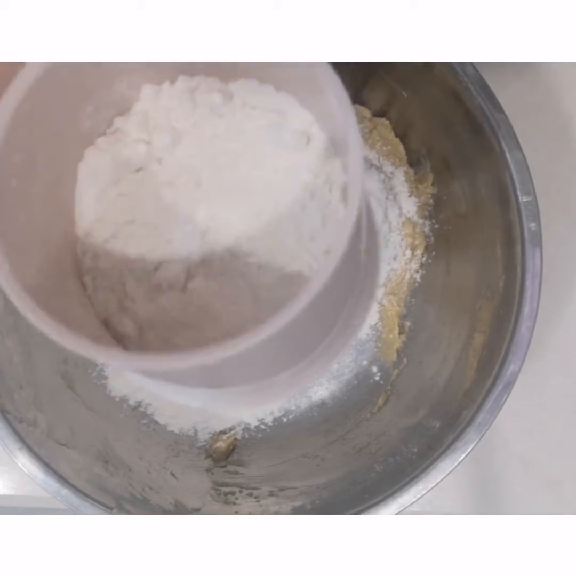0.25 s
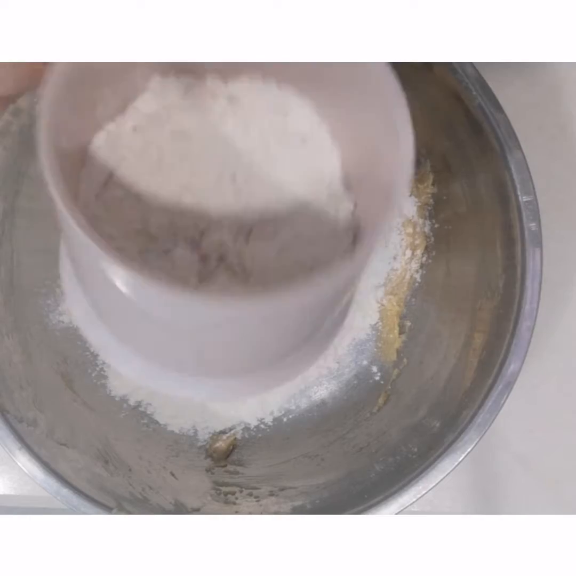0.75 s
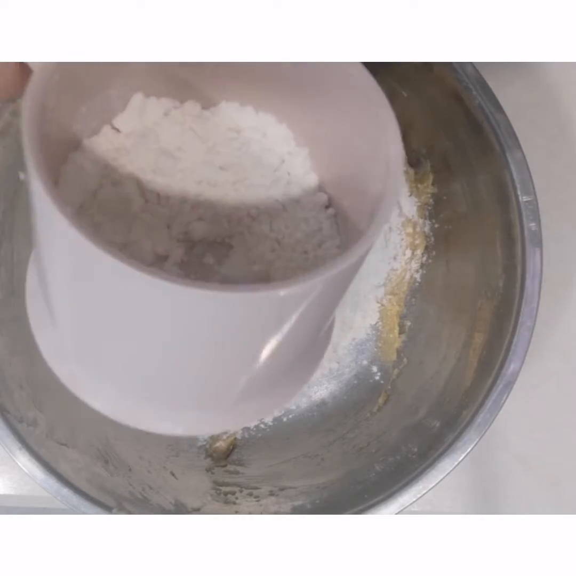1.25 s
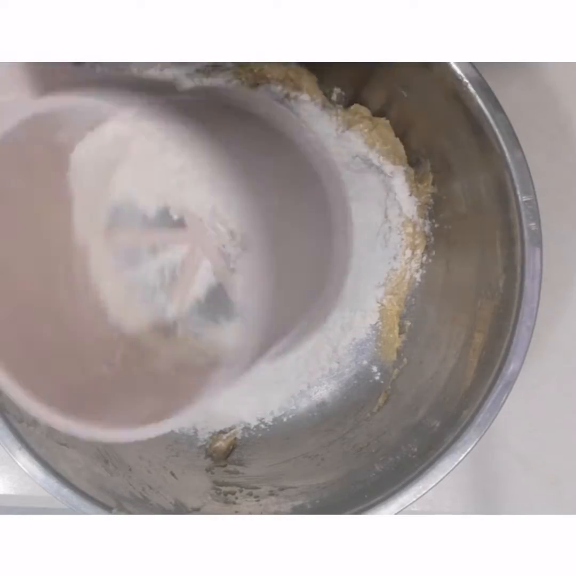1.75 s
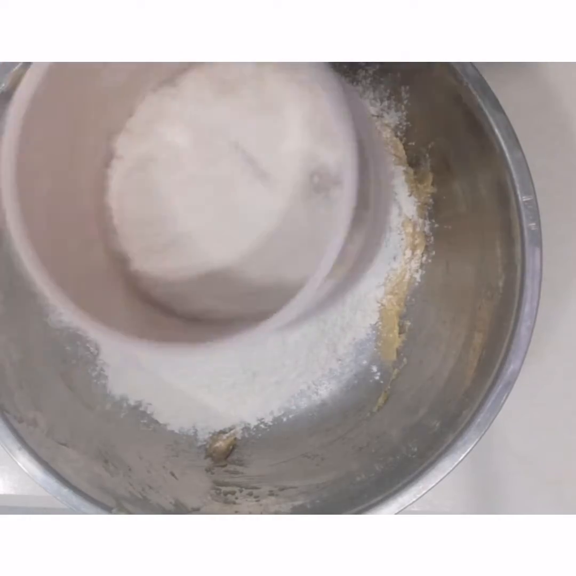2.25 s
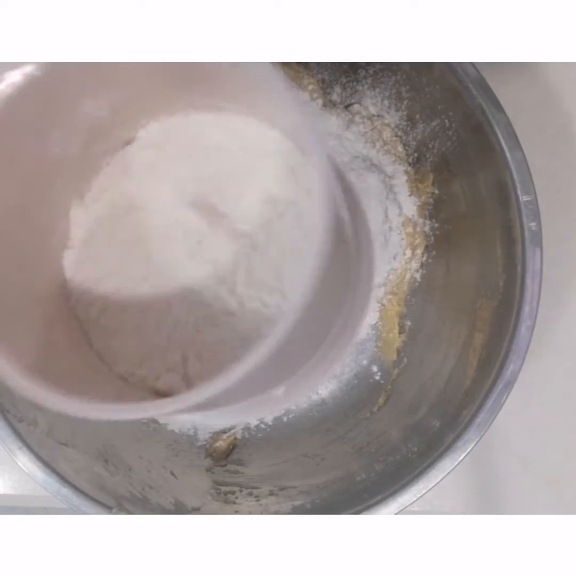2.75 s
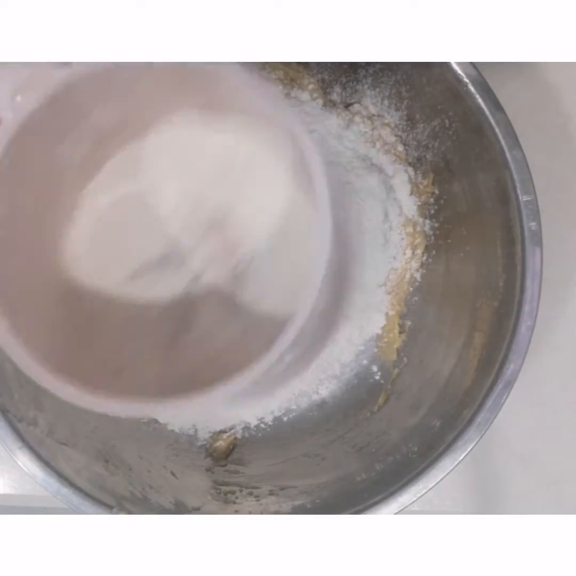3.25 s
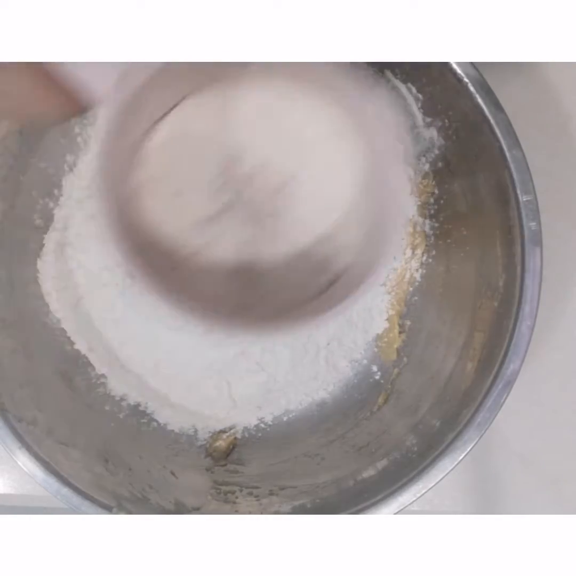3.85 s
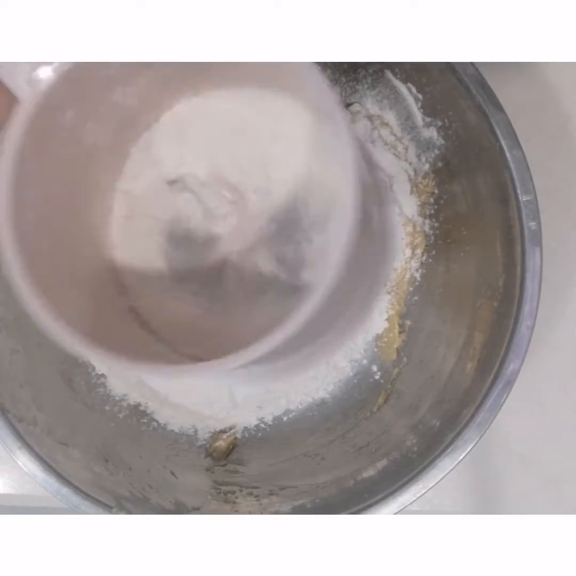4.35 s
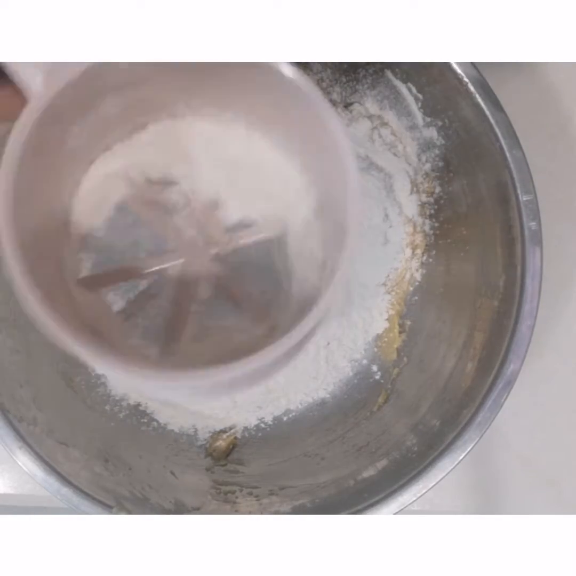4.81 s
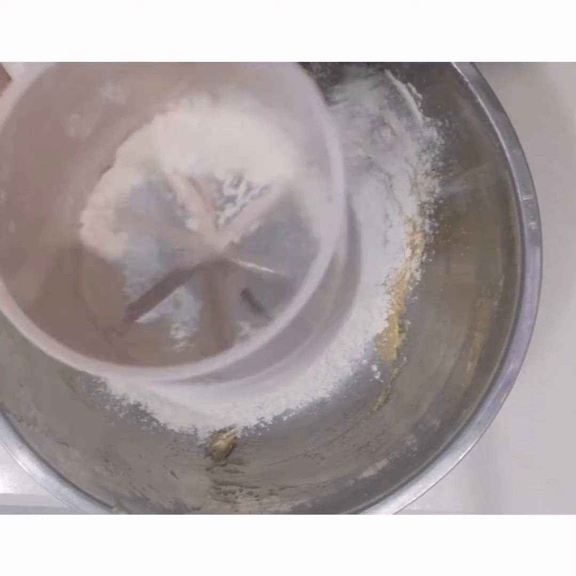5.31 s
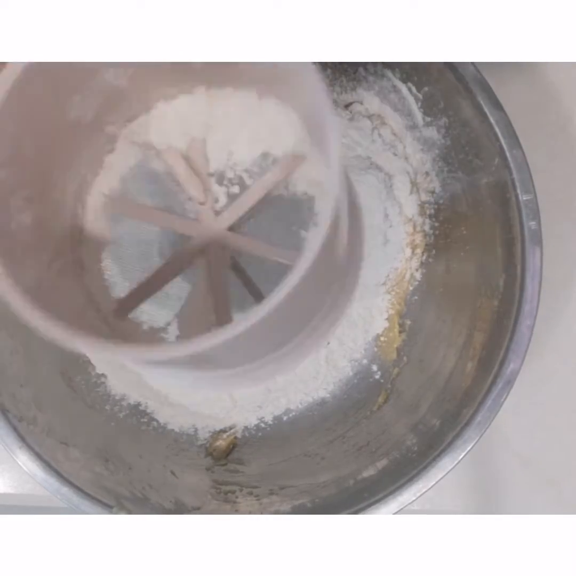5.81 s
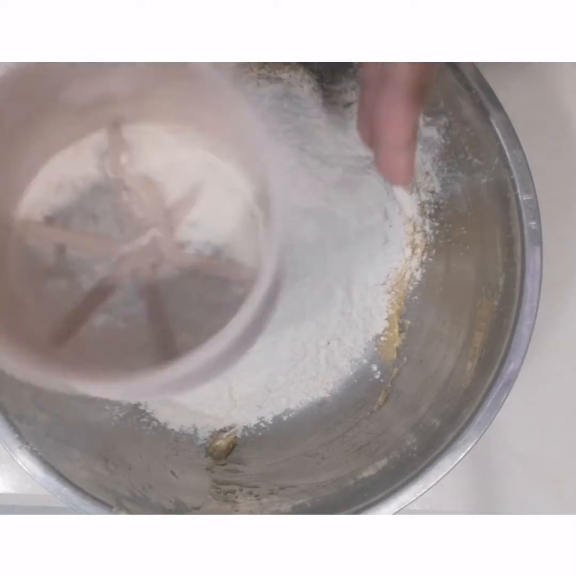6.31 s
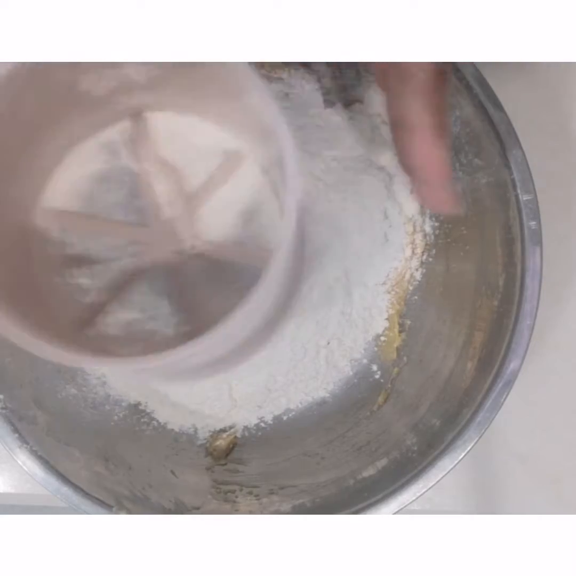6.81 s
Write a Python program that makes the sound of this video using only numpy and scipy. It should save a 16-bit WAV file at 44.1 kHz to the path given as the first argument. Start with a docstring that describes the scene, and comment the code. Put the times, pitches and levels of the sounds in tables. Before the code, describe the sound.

Close up in a small kitchen, a plastic flour sifter is squeezed over a steel bowl, about three times a second. Each squeeze rasps across wire mesh and ends in a sharp knock, followed by a softer return scrape. Six squeezes come first, then two, then seven, with short pauses between. The knocks brighten as the flour runs out, and the bowl rings faintly over a low hum.

```python
"""A plastic flour sifter is squeezed in three bursts over a steel mixing bowl in a small kitchen.
Each squeeze drags the blades over the wire mesh, ever faster, until the trigger knocks on its stop;
a spring pulls them back with a softer scrape. The knock brightens as the flour runs out.
Bowl and room ring on, over a low hum; a noise suppressor cuts the quiet tails short."""
import sys
import numpy as np
from scipy import signal
from scipy.fft import rfft, irfft, next_fast_len
from scipy.io import wavfile
from scipy.ndimage import uniform_filter1d, map_coordinates

SR = 44100
rng = np.random.default_rng(int(sys.argv[2]) if len(sys.argv) > 2 else 0)


def transcribe(signal):
    """Save signal, clipped to [-1, 1], as a 16-bit WAV file at the path in sys.argv[1]."""
    frames = np.atleast_2d(signal).T
    limited = np.clip(frames, -1, 1)
    pcm = np.round(limited * 32767).astype(np.int16)
    wavfile.write(sys.argv[1], SR, pcm)


N = 311787


def amp(db):
    """Turn decibels into a gain."""
    return 10 ** (np.asarray(db) / 20)


def unit(x):
    """Scale a sound to an average (rms) level of 1."""
    return x / np.sqrt(np.mean(x ** 2) + 1e-20)


def clock(seconds):
    """The time of each sample."""
    return np.arange(int(seconds * SR)) / SR


def along(points, hz):
    """Read between (Hz, value) rows, with octaves evenly spaced."""
    f, v = np.transpose(points)
    return np.interp(np.log(hz + 1), np.log(f + 1), v)


def curve(rows):
    """Join (seconds, value) rows into one value per sample."""
    return np.interp(np.arange(N) / SR, *np.transpose(rows))


def wobble(rate):
    """A smooth curve through `rate` random points a second."""
    return map_coordinates(rng.standard_normal(int(N * rate / SR) + 4), [np.arange(N) * rate / SR])


def swell(s, db, attack, release, hold=0):
    """A gain that reaches db at time s, holds and fades, moving 20 dB per attack or release time."""
    start = max(int((s - 2 * attack) * SR), 0)
    end = min(int((s + hold + 2 * release) * SR), N)
    t = np.arange(start, end) / SR - s
    gain = np.zeros(N)
    gain[start:end] = amp(db - 20 * np.maximum(0, np.maximum(-t / attack, (t - hold) / release)))
    return gain


def filtered(x, response):
    """Multiply each frequency in x by response(hz)."""
    n = x.shape[-1]
    m = next_fast_len(n + 8192)
    return irfft(rfft(x, m) * response(np.fft.rfftfreq(m, 1 / SR)), m)[..., :n]


def shaped(x, colour):
    """Give x a tone colour made of (Hz, dB) rows."""
    return filtered(x, lambda hz: amp(along(colour, hz)))


def add(track, s, sound):
    """Mix a sound in at time s."""
    part = track[..., max(round(s * SR), 0):][..., :sound.shape[-1]]
    part += sound[..., :part.shape[-1]]


def resonate(x, tones):
    """Let x ring a set of tones, in stereo. A ring time (t60) is the time to fade by 60 dB."""
    t = clock(.7)
    ring = sum(amp(db - 60 * t / t60) * np.sin(2 * np.pi * (hz * t + rng.random((2, 1))))
               for hz, db, t60 in tones)
    ring = unit(ring) / np.sqrt(len(t))
    return signal.fftconvolve(np.atleast_2d(x), ring, axes=1)[:, :N]


# A deep throb. Each row: time in seconds, level in dB.
THROB_LEVELS = [(0.0, -48.5), (0.35, -39.5), (1.83, -40), (2.3, -47), (2.62, -36.5), (3.31, -40.5),
                (3.48, -34.5), (3.6, -44.5), (4.31, -33.5), (4.39, -39), (5.55, -41), (5.71, -36),
                (6.61, -43.5), (6.71, -36), (6.91, -46.5), (7.07, -35.5)]
# A steady hum. Each row: pitch in Hz, level in dB.
HUM_TONES = [(49.5, -59.5), (136, -67), (236, -75.5)]
# Still air with a faint high whine. Each row: frequency in Hz, relative level in dB.
AIR_COLOUR = [(20, -8), (50, 1), (95, -8), (140, -5), (190, -12.5), (300, -17), (550, -22.5), (1100, -19.5),
              (2200, -18.5), (4000, -28.5), (8900, -32.5), (9500, -29), (10200, -38.5), (15000, -39)]

def background():
    """The room throbs, hums and hisses softly; the bass is the same on both sides."""
    def tone(hz, drift):
        return np.sqrt(2) * np.sin(2 * np.pi * hz * np.arange(N) / SR + drift * wobble(4.3))
    throb = amp(curve(THROB_LEVELS)) * tone(hz=26.3, drift=.3)
    hum = sum(amp(db + 2.5 * wobble(7)) * tone(hz, drift=1.4) for hz, db in HUM_TONES)
    mid = shaped(rng.standard_normal(N), AIR_COLOUR)
    side = filtered(rng.standard_normal(N),
                    lambda hz: amp(along(AIR_COLOUR, hz)) * hz ** 2 / (hz ** 2 + 300 ** 2))
    air = amp(-59) * np.array([mid + side, mid - side]) / np.std(mid)
    return throb + hum + air


# The rumble of the working hand. Each row: frequency in Hz, relative level in dB.
HAND_COLOUR = [(20, -14.5), (55, -1.5), (90, -7), (140, -11.5), (230, -16.5), (400, -23), (1000, -69)]

def hand(sifter):
    """Working the trigger shakes up a soft rumble that follows the sifter's loudness."""
    effort = np.sqrt(np.abs(uniform_filter1d(np.abs(sifter), size=9000)))
    rumble = shaped(rng.standard_normal(N), HAND_COLOUR)
    return amp(-60.5) * unit(effort) * unit(rumble)


# Flour leaves the cup. Each row: time in seconds, emptiness from 0 (full) to 1 (empty).
EMPTINESS = [(0, 0), (1.8, 0.2), (3.2, 0.2), (4.6, 0.86), (6.1, 1)]

def emptiness_at(s):
    """How empty the cup is at time s."""
    return np.interp(s, *np.transpose(EMPTINESS))


def lightened(x, edge_hz, loss_db):
    """With less flour weighing on it, the cup loses its low tones."""
    lows = filtered(x, lambda hz: 1 / (1 + (hz / edge_hz) ** 8))
    return x + lows * (amp(-loss_db * curve(EMPTINESS)) - 1)


# The tone colour of the wire mesh. Each row: frequency in Hz, relative level in dB.
MESH_COLOUR = [(60, -54.5), (400, -9), (620, -16), (800, -9.5), (980, -0.5), (1400, -11), (2400, -1.5),
               (3300, -7), (3900, -6.5), (5200, -6.5), (7000, -10.5), (8100, -8.5), (9500, -11),
               (10800, -20), (15000, -21.5)]

def mesh_grit(spike_db, grain_rate):
    """Mesh wires make countless tiny snaps of uneven size; the treble is scaled to level 1."""
    snaps = rng.standard_normal(N) * amp(spike_db * wobble(grain_rate))
    grit = shaped(snaps, MESH_COLOUR)
    return grit / np.std(filtered(grit, lambda hz: hz > 4000))


# The trigger is let go. Each row: start in seconds, time it gets home in seconds,
# level of the blades' first spurt in dB, level of the landing in dB.
RETURNS = [(.02, 0.081, -46.5, -41), (0.327, 0.382, -35, -41.5), (0.629, 0.682, -36, -39.5),
           (0.934, .996, -36, -39.5), (1.23, 1.291, -36.5, -38.5), (1.541, 1.597, -34, -34.5),
           (2.709, 2.763, -37.5, -35.5), (3.045, 3.102, -34.5, -37), (4.17, 4.231, -38.5, -41.5),
           (4.477, 4.534, -36.5, -37.5), (4.762, 4.814, -36.5, -36.5), (5.038, 5.096, -35, -34),
           (5.319, 5.377, -29.5, -38.5), (5.607, 5.673, -28, -42.5), (5.88, 5.943, -29.5, -36.5),
           (7.056, 7.11, -51, -42)]
# The trigger is squeezed. Each row: time it hits the stop in seconds, rasp in dB, knock in dB.
PULLS = [(0.2369, -30, -19.5), (0.5301, -27, -21.5), (0.8274, -29, -20), (1.134, -27.5, -20),
         (1.434, -24, -19.5), (1.7487, -26.5, -20), (2.9314, -26, -20.5), (3.2485, -26.5, -21),
         (4.3787, -27, -20.5), (4.67, -27.5, -17.5), (4.9532, -24, -17), (5.226, -24, -18.5),
         (5.5102, -25, -17), (5.7971, -24, -19), (6.078, -24, -23.5)]

def blades():
    """The blades scrape over the mesh, louder the faster they move."""
    pull, back = np.zeros(N), np.zeros(N)
    for s, home, spurt_db, _ in RETURNS:  # they spurt, catch once, then coast home
        back += swell(s + .01, spurt_db, attack=.01, release=.02)
        back += swell(s + .034, spurt_db - 8.5, attack=.012, release=.012)
        back += swell(s + .0062, db=-44.5, attack=.0062, release=.011, hold=home - s - .0062)
    for s, rasp_db, _ in PULLS:  # they break loose, then rasp into the stop
        loose_db = -37 + .5 * emptiness_at(s)  # louder on bare mesh
        pull += swell(s - .023, loose_db, attack=.03, release=.011)
        pull += swell(s - .0024, rasp_db, attack=.02, release=.009, hold=.0024)
    speed = amp(-.72) * pull + amp(-1.5) * back
    grit = mesh_grit(spike_db=3.5, grain_rate=1700)
    roughness = amp(1.8 * wobble(170))
    scrape = speed * grit * roughness
    # flour packed on the mesh muffles its hiss
    hiss = filtered(scrape, lambda hz: hz ** 2 / (hz ** 2 + 3800 ** 2))
    return scrape + hiss * (amp(-2.5 + 2.7 * curve(EMPTINESS)) - 1)


# The tones of the plastic cup. Each row: pitch in Hz, ring time in seconds,
# relative level in dB when full, the same when empty.
CUP_TONES = [(290, .025, -15, -41), (442, 0.054, -30.5, -20.5), (960, 0.009, -13, -26),
             (1115, 0.051, -4.5, -4.5), (1230, 0.014, -13.5, -4), (1636, 0.029, -3, 2.5),
             (2000, 0.0087, 2.5, -19.5), (2270, 0.025, 2, 6), (2610, 0.049, -5, -4),
             (3035, 0.0096, 0.5, 1.5), (3555, 0.013, -4, 3.5), (4406, 0.021, -14, -6),
             (5710, 0.014, -17.5, 0), (7270, .01, -23, -10.5)]

def cup_hit(s, crack_db, crack_t60, rise_s):
    """One hit on the cup: a short crack, and a ring that depends on the flour left at time s."""
    t, empty = clock(.08), emptiness_at(s)
    ring = np.zeros(len(t))
    for k, (hz, t60, full_db, empty_db) in enumerate(CUP_TONES):
        db = full_db + empty * (empty_db - full_db) + rng.normal(0, .62)
        pitch = hz * (1 + rng.normal(0, .0031))
        direction = (-1) ** k  # neighbouring tones start opposite ways
        ring += direction * amp(db - 60 * t / t60) * np.sin(2 * np.pi * pitch * t)
    ring *= 1 - np.exp(-t / rise_s)
    ring /= np.std(ring[:265])  # level 1 over the first 6 ms
    crack = unit(shaped(rng.standard_normal(len(t)), MESH_COLOUR))
    return ring + crack * amp(crack_db - 60 * t / crack_t60)


# Faint clicks, including sharp high ones just before some knocks.
# Each row: start in seconds, level in dB, treble boost or cut in dB.
FAINT_CLICKS = [(0.0203, -40.5, -8), (.192, -42, -3), (1.389, -50, 6), (2.591, -41, -18), (2.63, -43, -20),
                (2.871, -55, 12.5), (2.893, -37.5, 4.5), (3.536, -46, -0.5), (4.33, -50, 6.5),
                (5.465, -51.5, 11), (7.056, -52, 17.5)]
# The landing is duller than the knock. Each row: frequency in Hz, boost or cut in dB.
LANDING_COLOUR = [(400, 13), (700, 12.5), (1000, 7), (1500, -1), (4000, -5.5)]

def trigger_and_clicks():
    """The trigger knocks, chatters, takes up slack and taps home; faint clicks sound in between."""
    hits = np.zeros(N)
    for s, _, knock_db in PULLS:
        add(hits, s, amp(knock_db) * cup_hit(s, crack_db=-2, crack_t60=.007, rise_s=.00016))
        chatter_s = s + rng.uniform(.002, .003)
        chatter = cup_hit(s, crack_db=-3, crack_t60=.0073, rise_s=.00047)
        add(hits, chatter_s, amp(knock_db - 13.5) * chatter)
    for s, home, spurt_db, landing_db in RETURNS:
        slack_db = spurt_db - 11 + 10 * emptiness_at(s)
        add(hits, s + .01, amp(slack_db) * cup_hit(s, crack_db=7, crack_t60=.015, rise_s=.00045))
        tap = cup_hit(s, crack_db=6.5, crack_t60=.014, rise_s=.0005)
        add(hits, home, amp(landing_db) * shaped(tap, LANDING_COLOUR))
    for s, db, treble_db in FAINT_CLICKS:
        click = cup_hit(s, crack_db=7.5, crack_t60=.0099, rise_s=.00091)
        add(hits, s, amp(db) * shaped(click, [(1800, 0), (3000, treble_db)]))
    # so small a cup gives off little bass
    return filtered(hits, lambda hz: hz ** 2 / (hz ** 2 + 200 ** 2))


# A ring near 900 Hz. Each row: pitch in Hz, relative level in dB, ring time in seconds.
RING_TONES = [(885, 0, .15), (935, 0, .13), (985, -3, .09)]

def short_ring(scrape):
    """A short ring follows scrapes and landings; a higher one takes over as the cup empties."""
    buzz, t = np.zeros(N), clock(.15)
    for _, home, _, landing_db in RETURNS:
        add(buzz, home, amp(landing_db - 60 * t / .36) * rng.standard_normal(len(t)))
    empty = curve(EMPTINESS)
    high_share = empty ** 6  # stays small until the cup is nearly empty
    low_drive = amp(-2.5 - 1.5 * empty) * (1 - high_share) * (buzz + amp(-18) * scrape)
    high_drive = amp(-13.5) * high_share * scrape
    high_tones = [(hz * 1.18, db, t60 * .25) for hz, db, t60 in RING_TONES]
    return resonate(low_drive, RING_TONES) + resonate(high_drive, high_tones)


# The tones of the steel bowl. Each row: pitch in Hz, relative level in dB, ring time in seconds.
BOWL_TONES = [(1177, 1, 0.6), (1290, -8, .4), (1347, 3, .35), (1415, 8, 0.29), (1710, 5, 0.28),
              (1853, 3, 0.88), (2173, -1, .34), (2260, -2, 0.2), (2510, -6.5, 0.18), (2760, 2, 0.6),
              (2806, -3, 0.55), (3000, 3, 0.33), (3203, 1, 0.45), (3530, -10.5, .3), (4590, -4, 0.26),
              (4900, -6, 0.38)]

def bowl(sifter):
    """The sifter's sound sets the bowl below it ringing."""
    return amp(-15) * resonate(sifter, BOWL_TONES)


def left_first(x, lag_s):
    """Direct sound reaches the left microphone before the right."""
    return filtered(x, lambda hz: np.exp(1j * np.pi * hz * lag_s * np.array([[1], [-1]])))


# Where the mesh is heard. Each row: frequency in Hz, left level minus right level in dB.
MESH_BALANCE = [(300, -1), (900, 15), (1400, -1), (2400, -1), (7000, 10.5), (8200, 16), (9600, -17.5),
                (11000, 2)]

def lean(x):
    """Some frequencies lean to the left, others to the right."""
    return filtered(x, lambda hz: amp(along(MESH_BALANCE, hz) * np.array([[.5], [-.5]])))


def echoes(x, t60s, colour, build_up_s):
    """Countless echoes blur into stereo noise; each frequency band fades at its own speed."""
    hz, t, spectrum = signal.stft(x, SR, nperseg=256)
    age = t[:300]
    decay = amp(-60 * age / along(t60s, hz)[:, None]) ** 2 * (1 - np.exp(-age / build_up_s))
    decay /= decay.sum(axis=1, keepdims=True)
    energy = np.abs(signal.fftconvolve(np.abs(spectrum) ** 2, decay, axes=1)[:, :len(t)])
    noise = signal.stft(rng.standard_normal((2, N)), SR, nperseg=256)[2]
    gain = np.sqrt(energy) * amp(along(colour, hz))[:, None] / np.std(noise)
    return signal.istft(noise * gain, SR, nperseg=256)[1][:, :N]


# How long the kitchen echoes. Each row: frequency in Hz, ring time in seconds.
ROOM_RING_TIMES = [(200, 0.44), (700, 0.78), (1170, 0.79), (1450, 0.56), (2600, 0.71), (4000, 0.6),
                   (10000, 0.5), (15000, 0.26)]
# How loud it echoes. Each row: frequency in Hz, relative level in dB.
ROOM_COLOUR = [(200, -13), (700, -4.5), (1150, -4), (1450, -1), (2200, -3.5), (2750, -4), (3250, -5),
               (9000, -3.5), (14000, -5.5)]

def kitchen(sifter):
    """The bowl's walls scatter the sound at once, then the room answers; both ease as the cup empties."""
    sound = sifter * amp(-1.2 * curve(EMPTINESS))
    bowl_walls = echoes(sound, t60s=[(1000, .084), (3000, .041), (8000, .027)],
                        colour=[(500, -12.5), (1500, -6), (8000, 1)], build_up_s=.002)
    return bowl_walls + echoes(sound, ROOM_RING_TIMES, ROOM_COLOUR, build_up_s=.0043)


# Soft rustles. Each row: peak time in seconds, relative level in dB, fade time in seconds.
RUSTLES = [(2.52, -54.5, .03), (3.436, -46.5, 0.044), (6.42, -58, 0.19), (6.57, -63, 0.047),
           (6.681, -54.5, 0.15), (6.872, -52.5, 0.029), (7.028, -63.5, .08)]

def rustles():
    """Soft, short, gritty rustles come between and after the bursts."""
    loudness = sum(swell(s, db, fade, fade) for s, db, fade in RUSTLES)
    return amp(-5.5) * loudness * mesh_grit(spike_db=4.5, grain_rate=480)


def scene():
    """The sifter up close, all that it sets ringing, and the room's background."""
    scrape = lightened(blades(), edge_hz=1000, loss_db=8)
    knocks = lightened(trigger_and_clicks(), edge_hz=900, loss_db=4)
    rustle = rustles()
    sifter = lightened(scrape + knocks + rustle, edge_hz=1060, loss_db=1)
    direct = lean(left_first(scrape + rustle, lag_s=.0005864)) + left_first(knocks, lag_s=.000651)
    return direct + bowl(sifter) + short_ring(scrape) + kitchen(sifter) + hand(sifter) + background()


def noise_suppressor(x, threshold_db, depth_db, knee_db):
    """Everything above the bass is turned down whenever it gets quiet."""
    upper = filtered(x, lambda hz: hz ** 4 / (hz ** 4 + 350 ** 4))
    power = uniform_filter1d(np.mean(upper ** 2, axis=0), size=1300)
    level_db = 10 * np.log10(np.abs(power) + 1e-12)
    closed = (1 - np.tanh((level_db - threshold_db) / knee_db)) / 2
    return x + upper * (amp(-depth_db * closed) - 1)


def record(dry):
    """Quiet tails are turned down, then all above 15700 Hz is cut away."""
    quiet = noise_suppressor(dry, threshold_db=-49, depth_db=7.5, knee_db=3.5)
    return filtered(quiet, lambda hz: np.clip((15700 - hz) / 500, 0, 1))


dry = scene()
out = record(dry)
transcribe(out)
```